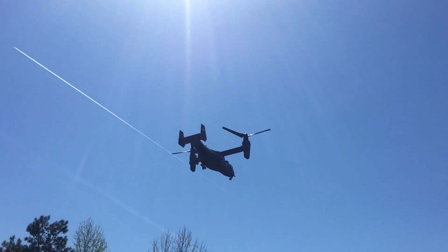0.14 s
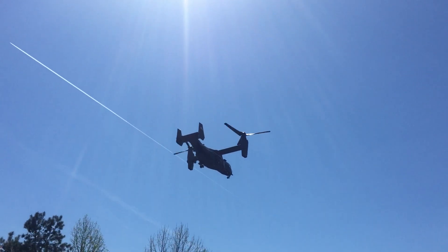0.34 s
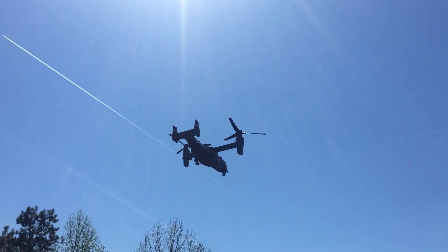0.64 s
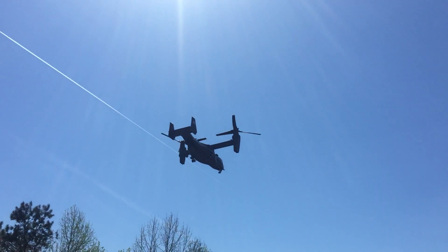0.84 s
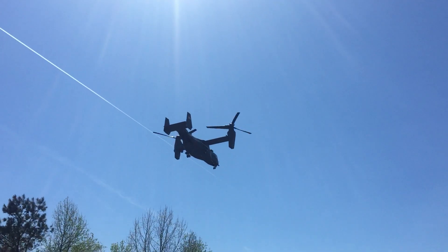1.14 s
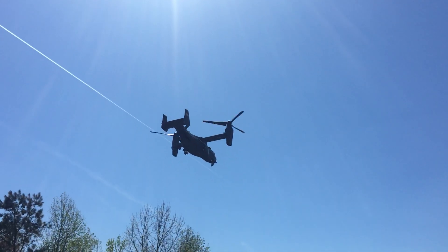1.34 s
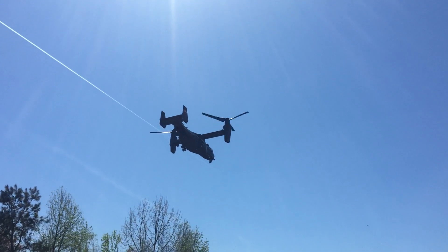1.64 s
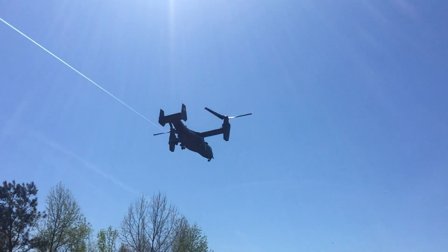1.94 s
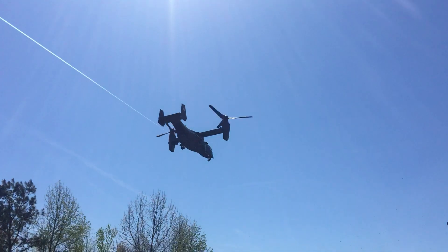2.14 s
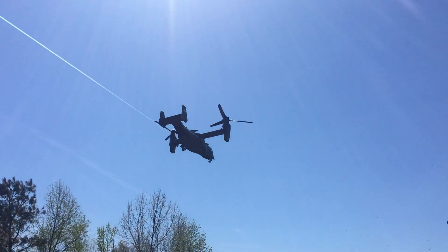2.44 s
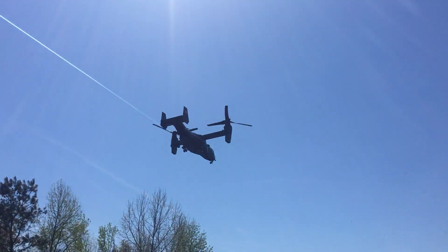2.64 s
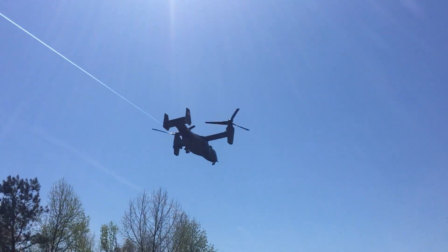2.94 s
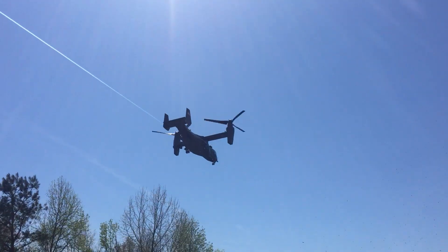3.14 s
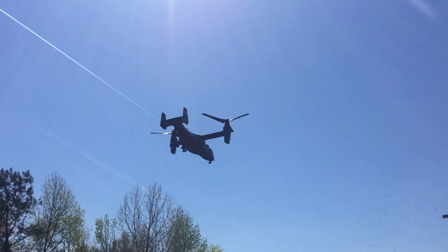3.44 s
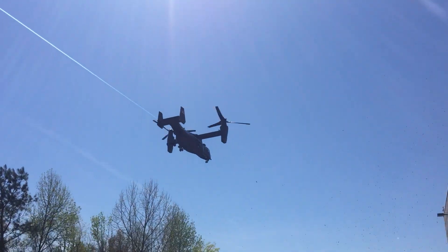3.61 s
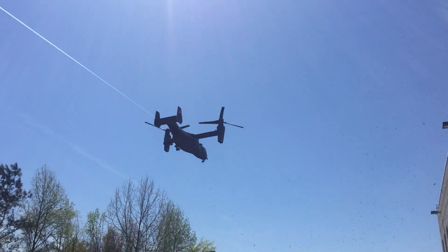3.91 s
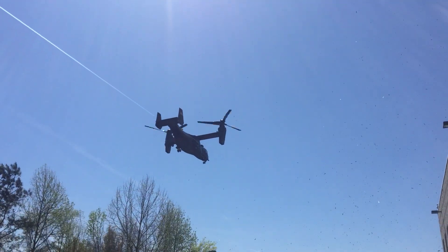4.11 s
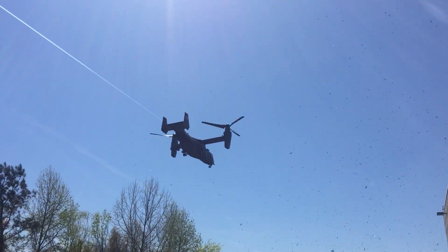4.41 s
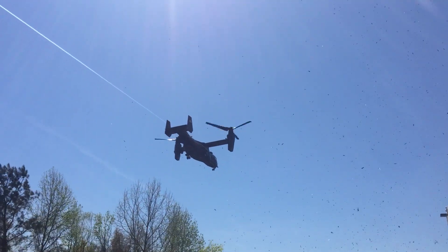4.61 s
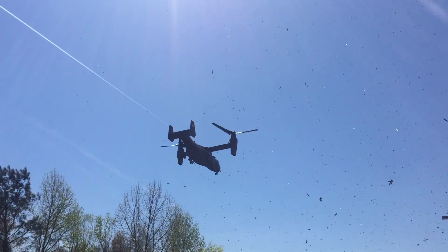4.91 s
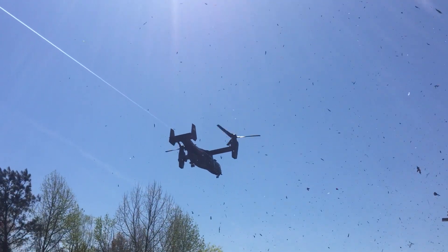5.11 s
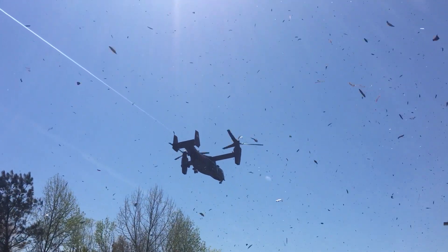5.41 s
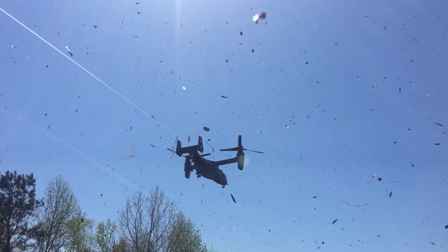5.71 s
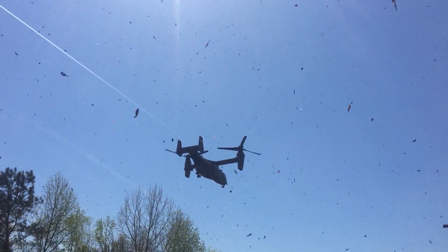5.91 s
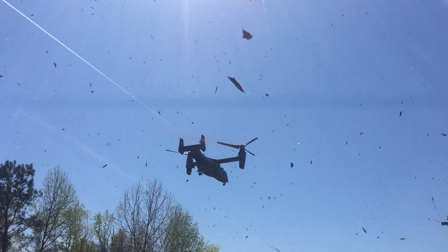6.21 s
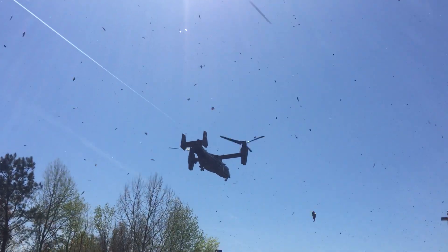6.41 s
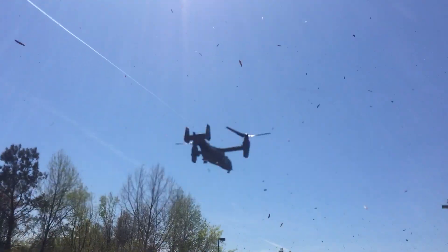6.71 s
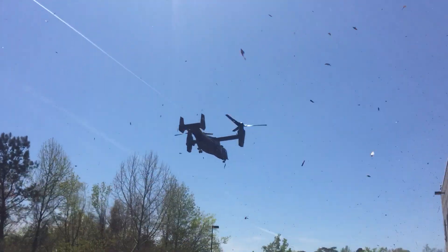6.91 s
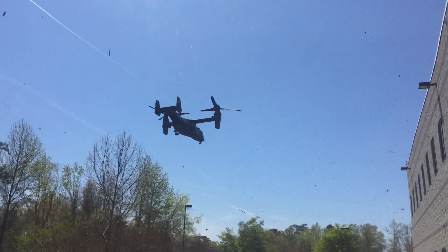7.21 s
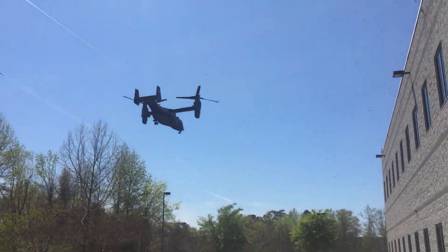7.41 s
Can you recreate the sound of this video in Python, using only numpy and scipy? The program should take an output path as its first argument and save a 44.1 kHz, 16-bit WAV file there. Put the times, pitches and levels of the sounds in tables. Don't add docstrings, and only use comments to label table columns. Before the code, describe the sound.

A heavy twin-rotor aircraft hovers low over a yard by a building. Loud, steady blade slaps, about twenty a second, ride on a throbbing broadband roar with low hum. Some slaps sharpen into cracks, and ground and wall echoes double them. Midway the chop changes colour as the craft turns. In the last second, downwash thuds and hisses across a close, overloaded handheld microphone, with a few grit ticks.

```python
import sys
import numpy as np
from scipy import signal
from scipy.fft import rfft, irfft
from scipy.io import wavfile

SR = 44100
rng = np.random.default_rng(int(sys.argv[2]) if len(sys.argv) > 2 else 0)


def gain_from_decibels(decibels):
    exponent = np.asarray(decibels, float) / 20
    return 10 ** exponent


def digitize_waveform(pressure):
    field = np.atleast_2d(pressure).T
    bounded = np.clip(field, -1, 1)
    quanta = np.round(bounded * 32767).astype(np.int16)
    wavfile.write(sys.argv[1], SR, quanta)


N = 332955
T = np.arange(N) / SR
NEAR_LAG_MS = .1
# (time [s], roar level [dB], throb depth [dB], shock level [dB])
ROTOR_LOAD = [(0.0, -24.5, 6, -5.5), (0.21, -26, 10, -3), (1.91, -26.5, 7, -5.5), (2.1, -26, 6.5, -2.5),
              (3.57, -24, 5.5, -10), (3.74, -25, 4.5, -10), (4.7, -26, 6, -23), (4.9, -25.5, 5, -11),
              (5.64, -25.5, 9, -14), (6.16, -26, 6.5, -10), (6.41, -27.5, 11.5, -3.5),
              (6.9, -20.5, 2, -2.5), (7.17, -24.5, 7.5, -12), (7.42, -26, 2.5, -43), (7.55, -27.5, 8, 2)]


def in_time(rows, t):
    s, *columns = np.transpose(rows)
    return [np.interp(t, s, c) for c in columns]


def rms_one(x):
    return x / np.sqrt(np.mean(x ** 2) + 1e-20)


def cut(x, hz, kind, order=2):
    hz = np.clip(hz, 10, .45 * SR)
    return signal.sosfilt(signal.butter(order, hz, kind, fs=SR, output="sos"), x)


def coloured(spectrum):
    hz = np.fft.rfftfreq(N, 1 / SR) + 1
    point_hz, point_db = np.transpose(spectrum)
    shape_db = np.interp(np.log(hz), np.log(point_hz), point_db)
    return rms_one(irfft(rfft(rng.standard_normal(N)) * gain_from_decibels(shape_db), N))


def drift(rate_hz):
    if rate_hz > 10:
        return rms_one(cut(rng.standard_normal(N + SR), rate_hz, "low")[SR:])
    knots_s = np.arange(200) / rate_hz / 2
    return rms_one(np.interp(T, knots_s, rng.standard_normal(200)))


def clicks(times_s, sizes):
    out = np.zeros(N)
    index = np.round(np.asarray(times_s) * SR).astype(int)
    inside = (index >= 0) & (index < N)
    np.add.at(out, index[inside], np.asarray(sizes)[inside])
    return out


def spike(train, width_ms):
    u = np.arange(-100, 101) / SR * 1000 / width_ms
    return signal.fftconvolve(train, -u * np.exp(.5 - u ** 2 / 2), "same")


def swells(rows):
    levels = []
    for s, db, rise_ms, fall_ms in rows:
        scale_ms = np.where(T < s, rise_ms, fall_ms)
        levels.append(gain_from_decibels(db) * np.exp(-np.abs(T - s) * 1000 / scale_ms))
    return np.max(levels, axis=0)


def blade_times():
    blade_hz, first_s = 20.52, .022
    # (time [s], extra delay [ms])
    travel = [(0.0, 19.1), (0.45, 17.05), (0.9, 16.5), (1.2, 15.1), (1.65, 14.6), (2.55, 15.0),
              (2.75, 15.4), (3.9, 15.75), (4.2, 15.0), (4.5, 15.05), (4.8, 16.0), (5.2, 17.5), (5.42, 17.9),
              (5.68, 19.5), (6.0, 19.35), (6.7, 21.2), (7.05, 23.0), (7.55, 23.4)]
    sent = first_s + np.arange(-1, 156) / blade_hz
    return sent + in_time(travel, sent + .018)[0] / 1000


def ground_lag(t):
    # (time [s], extra delay [ms])
    detour = [(0.0, 4.49), (1.5, 4.23), (3.1, 4.014), (3.7, 3.5), (5.0, 3.32), (5.3, 2.82), (5.6, 3.35),
              (7.55, 3.32)]
    return in_time(detour, t)[0] / 1000


def drone(turns):
    # (peak time [s], level [dB], rise [ms], fall [ms])
    wall_swells = [(0.12, -27, 500, 750), (0.8, -20, 70, 180), (1.76, -24, 470, 380), (2.48, -24, 240, 360),
                   (4.3, -21.5, 810, 350), (5.17, -24, 380, 200), (5.61, -29, 71, 430),
                   (6.06, -27, 600, 190), (6.7, -22.5, 320, 29), (7.5, -45, 900, 500)]
    return gain_from_decibels(1.5) * swells(wall_swells) * np.sin(2 * np.pi * 8 * turns)


def hum(turns):
    # (blade multiple [-], level [dB])
    tones = [(1, -15), (2, -27), (3, -6), (4, -5)]
    # (time [s], level [dB])
    hum_level = [(0.0, -30), (1.91, -31), (2.1, -26.5), (3.57, -33.5), (3.74, -40.5), (4.7, -38.5),
                 (4.9, -26), (5.64, -32.5), (5.86, -24.5), (6.16, -40), (6.6, -28)]
    hum_db, = in_time(hum_level, T)
    tone_sum = np.zeros(N)
    for k, db in tones:
        tone_sum += gain_from_decibels(db + 2 * drift(1.5)) * np.sin(2 * np.pi * (k * turns + rng.random()))
    return gain_from_decibels(hum_db + 2.0) * tone_sum * np.clip((6.6 - T) / .3, 0, 1)


def roar(at):
    # (frequency [Hz], density [dB per Hz])
    spectrum = [(30, -28.5), (100, -6), (170, -6), (270, 3), (370, -2), (550, -4), (1000, -7.5),
                (2000, -13.5), (3000, -20.5), (4600, -29.5), (5200, -33), (6800, -42.5), (9500, -54.5),
                (10500, -60)]
    bounce_db = -11
    roar_db, throb_db, _ = in_time(ROTOR_LOAD, T)
    ms = np.arange(-500, 1400) / SR * 1000
    swell = np.exp(-((ms - 2.5) / 9.) ** 2)
    passes = clicks(at, gain_from_decibels(1.5 * rng.standard_normal(len(at))))
    throb = signal.fftconvolve(passes, swell)[500:500 + N]
    source = coloured(spectrum) * gain_from_decibels(throb_db * throb + 1.36 * drift(38))
    bounced = np.interp(T - ground_lag(T), T, cut(source, 2100, "low"))
    return gain_from_decibels(roar_db + 1.0) * (source + gain_from_decibels(bounce_db) * bounced)


def snaps():
    # (time [s], peak level [dB])
    loud = [(0.571, -12), (0.6685, -13), (0.719, -8), (1.6913, -7.5), (1.743, -12), (2.862, -20),
            (5.056, -7), (5.105, -5.5), (5.139, -7.5), (5.177, -28), (5.645, -15.5), (6.0587, -17),
            (6.131, -5), (7.47, -7), (7.529, -16)]
    struck = rng.random(N) < 120. / SR
    faint = struck * gain_from_decibels(-42 + 5.4 * np.minimum(rng.exponential(1, N), 4))
    s, db = np.transpose(loud)
    return spike(faint + clicks(s, gain_from_decibels(db)), width_ms=0.15)


def gust():
    # (peak time [s], level [dB], rise [ms], fall [ms])
    thuds = [
        (6.592, -16.5, 27, 17),
        (6.716, -19.5, 100, 98),
        (6.866, -6, 15, 19),
        (7.222, -15.5, 140, 18),
        (7.382, -19.5, 160, 19),
        (7.456, -19.5, 20, 27),
    ]
    # (frequency [Hz], density [dB per Hz])
    thud_spectrum = [(20, -14), (40, -1.5), (70, 6), (130, -3.5), (250, -11), (500, -31), (1000, -67)]
    # (peak time [s], level [dB], rise [ms], fall [ms])
    puffs = [(6.695, -18.5, 11, 20), (6.72, -10.5, 11, 16), (6.765, -22, 35, 2.1), (6.83, -23, 15, 83),
             (6.885, -13, 7.9, 17), (6.96, -19.5, 33, 33), (7.103, -12, 6, 6.7), (7.2, -35.5, 32, 87),
             (7.365, -9, 4.5, 7.2)]
    # (frequency [Hz], density [dB per Hz])
    tear_spectrum = [(100, -39), (250, -12), (600, 6), (1200, -5), (2500, -7), (5000, -21.5), (9000, -36),
                     (16000, -50.5)]
    thud = swells(thuds) * gain_from_decibels(3. * drift(15)) * coloured(thud_spectrum)
    thud = thud * np.clip((T - 6.4) / .15, 0, 1)
    tear = swells(puffs) * gain_from_decibels(3 * drift(150)) * coloured(tear_spectrum)
    return thud + tear


def grit():
    # (time [s], peak level [dB], ring [ms])
    grains = [
        (4.471, -29, 1.5),
        (6.057, -31, 1.),
        (7.2642, -9, 1.6),
        (7.2725, -10, 2.2),
        (7.279, -25, 2.),
        (7.3627, -25, 1.5),
    ]
    fade = sum(gain_from_decibels(db) * (T >= s) * np.exp(-np.abs(T - s) * 1000 / ms) for s, db, ms in grains)
    rattle = fade * rng.choice([-1, 1], N)
    return gain_from_decibels(-3.0) * cut(rattle, 2800, "high") + gain_from_decibels(-7.0) * cut(rattle, [4800, 7500], "band")


def shreds(at):
    chance = rng.standard_normal((len(at), 2, 5))
    shock_db = in_time(ROTOR_LOAD, at)[2][:, None]
    times = (at[:, None] + (2.476 + 6.0 * chance[:, 0]) / 1000).ravel()
    sizes = gain_from_decibels(shock_db - 9.0 + 2.9 * chance[:, 1]).ravel()
    bounced = gain_from_decibels(-5.5) * clicks(times + ground_lag(times), sizes)
    return spike(clicks(times, sizes) + bounced, width_ms=0.23)


def cracks(at):
    # (time [s], peak level [dB])
    lone = [(0.28, -33.5), (0.7192, -21.5), (0.9153, -18.5), (1.0603, -28), (1.6904, -24), (1.741, -28.5),
            (2.569, -50), (2.862, -30), (4.4696, -30), (5.057, -38), (5.1047, -29.5), (5.6446, -33.5),
            (6.0327, -27), (6.0575, -34.5), (6.2781, -32)]
    # (middle [s], half length [s], level [dB])
    runs = [(0.298, 0.18, -44), (0.66, 0.16, -27), (1.1, 0.35, -25.5), (1.5, 0.22, -44), (2.15, .2, -43),
            (5.86, .06, -48), (6.4, 0.085, -21.5), (6.593, 0.086, -12.5), (3.8, 4.5, -52)]
    lead_ms, scatter_db = 0.58, 5
    chance = rng.standard_normal((len(at), 2))
    run_db = np.max([db - 20 * ((at - s) / half_s) ** 4 for s, half_s, db in runs], axis=0)
    run_db = run_db + scatter_db * chance[:, 0]
    run_s = at + (1.1 * chance[:, 1] - lead_ms) / 1000
    lone_s, lone_db = np.transpose(lone)
    s, db = np.append(run_s, lone_s), np.append(run_db, lone_db)
    fronts = clicks(s, gain_from_decibels(db + 6.5)) + clicks(s + ground_lag(s), gain_from_decibels(db))
    fade = signal.lfilter([1], [1, -np.exp(-1000 / SR / 0.57)], fronts + 1e-18)
    burst = cut(fade * rng.choice([-1, 1], N), 1400, "high")
    return gain_from_decibels(8.0) * cut(burst, 4500, "low") + gain_from_decibels(-17.5) * burst


def shocks(at):
    scatter_ms, scatter_db = .4, 2.5
    edge = at + (NEAR_LAG_MS - .65 + scatter_ms * rng.standard_normal(len(at))) / 1000
    shock_db = in_time(ROTOR_LOAD, at)[2] - 3
    direct_db, bounce_db = shock_db + scatter_db * rng.standard_normal((2, len(at)))
    fronts = clicks(edge, gain_from_decibels(direct_db)) + clicks(edge + ground_lag(at), gain_from_decibels(bounce_db - 4))
    return spike(fronts, width_ms=.16)


def slap(train, swing_hz, fade_ms, lead, lead_ms, edge_ms, start):
    ms = np.arange(-400, 900) / SR * 1000 + 1000 / swing_hz / 6
    past = (1 + np.tanh(ms / edge_ms)) / 2
    before = lead * np.exp(np.minimum(ms, 0) / lead_ms)
    swing = -np.sin(2 * np.pi * swing_hz * ms / 1000 + start)
    after = swing * np.exp(-np.maximum(ms, 0) / fade_ms)
    return signal.fftconvolve(train, (1 - past) * before + past * after)[400:400 + N]


def side_paths(rows, at):
    turn_start_s, turn_end_s, wander_db = 3.05, 3.7, 3
    turn = np.clip((at - turn_start_s) / (turn_end_s - turn_start_s), 0, 1)
    paths = []
    for ms, turned_ms, db, turned_db in rows:
        wander = wander_db * np.interp(at, T, drift(1.167))
        paths.append((ms + turn * (turned_ms - ms), db + turn * (turned_db - db) + wander))
    return paths


def arrivals(at, paths):
    chance = rng.standard_normal((len(at), 2, len(paths)))
    out = np.zeros(N)
    for k, (ms, db) in enumerate(paths):
        times = at + (ms + .09 * chance[:, 0, k]) / 1000
        out += clicks(times, gain_from_decibels(db + 1.3 * chance[:, 1, k]))
    return out


def rotors(at):
    # (time [s], near rotor [dB], its ground bounce [dB], far rotor [dB], far rotor lag [ms])
    pose = [(0.0, 2, 5, 0, 8.8), (0.67, -3, 7.5, -12, 9.9), (1.3, 5.5, 3.5, -2.5, 9.2),
            (2.0, 1, 1.5, -7.5, 8.7), (2.87, -5, -0.5, -7.5, 9.9), (3.2, -3.5, 0, -20, 6.7),
            (3.5, 0.5, 0.5, -1.5, 7.0), (3.74, -2.5, -3.5, -3, 7.13), (4.18, -8, -15, -1.5, 8.34),
            (4.62, -2, -11, 0, 7.3), (5.06, -7, -41, -3.5, 8.38), (5.5, -4.5, -26, -5.5, 7.8),
            (5.94, -7, -5, -7.5, 7.9), (6.38, -2.5, -10, -2.5, 7.7), (6.81, 1.5, -11, -11, 7.2),
            (7.55, -2.5, -14.5, -4, 8.0)]
    # (lag before [ms], lag after [ms], level before [dB], level after [dB])
    vortex_paths = [
        (-2.13, -2.5, -7, -23.5),
        (1.9, 0.8, -8.5, -9.5),
    ]
    # (lag before [ms], lag after [ms], level before [dB], level after [dB])
    far_bounce = [(13.1, 11.3, -19, -14)]
    # (lag before [ms], lag after [ms], level before [dB],
    # level after [dB])
    outer_paths = [(-1.5, -5.5, -20.5, -10.5), (14, 15, -2.5, -10.5), (17.5, 20.5, -18, -13.5),
                   (25, 24.5, -11.5, -24), (30.0, 30.5, -28, -28.5), (34.5, 35.5, -13.5, -11.5)]
    glint_s, glint_half_s, glint_db = 5.8, .4, 12
    near_db, bounce_db, far_db, far_ms = in_time(pose, at)
    bounce_ms = NEAR_LAG_MS + 1000 * ground_lag(at)
    near = slap(arrivals(at, [(NEAR_LAG_MS, near_db), (bounce_ms, bounce_db)]),
                swing_hz=257, fade_ms=1.94, lead=.96, lead_ms=.74, edge_ms=.4, start=.58)
    (echo_ms, echo_db), = side_paths(far_bounce, at)
    echo_db = echo_db + glint_db * np.exp(-((at - glint_s) / glint_half_s) ** 2)
    far = slap(arrivals(at, [(far_ms, far_db), (echo_ms, echo_db)]),
               swing_hz=344, fade_ms=2.04, lead=.19, lead_ms=2.4, edge_ms=.62, start=.51)
    vortex = slap(arrivals(at, side_paths(vortex_paths, at)),
                  swing_hz=528, fade_ms=2., lead=0, lead_ms=.2, edge_ms=1.5, start=.36)
    outer = slap(arrivals(at, side_paths(outer_paths, at)),
                 swing_hz=232, fade_ms=2.75, lead=.25, lead_ms=1.4, edge_ms=1.5, start=.66)
    return gain_from_decibels(.3) * cut(near + far + vortex + outer, 75, "high")


def scene():
    at = blade_times()
    turns = np.interp(T, at, np.arange(len(at)))
    background = drone(turns) + hum(turns) + roar(at) + snaps()
    downwash = gust() + grit()
    return (background + downwash + shreds(at) + cracks(at) + shocks(at) + rotors(at))[None]


def roll_off(x):
    return signal.sosfilt(signal.butter(12, 15850, fs=SR, output="sos"), x)


def record(dry):
    # (frequency [Hz], width [Hz], share removed [-])
    port_dips = [(4900, 500, 0.39), (7600, 1100, 0.33), (10500, 1000, 0.35)]
    ceiling = .715
    x = cut(dry, 13, "high", order=1) / ceiling
    for hz, width_hz, share in port_dips:
        x = x - share * signal.lfilter(*signal.iirpeak(hz, hz / width_hz, fs=SR), x)
    x = ceiling * x / (1 + np.abs(x) ** 5) ** (1 / 5)
    return roll_off(cut(x, 15900, "low", order=16))


dry = scene()
out = record(dry)
digitize_waveform(out)
```